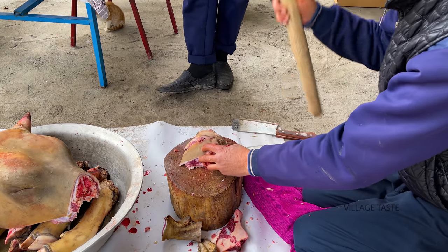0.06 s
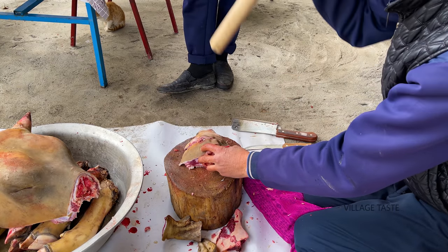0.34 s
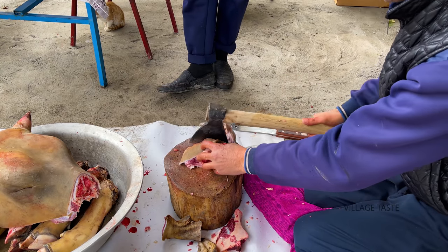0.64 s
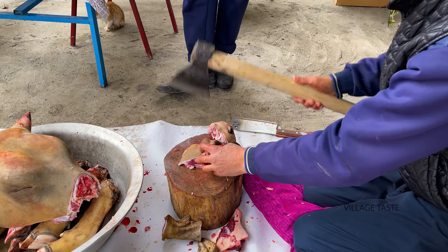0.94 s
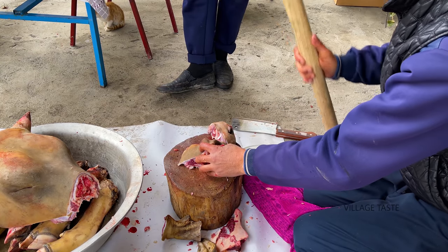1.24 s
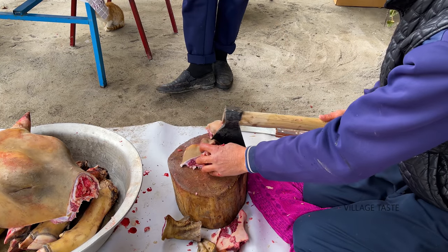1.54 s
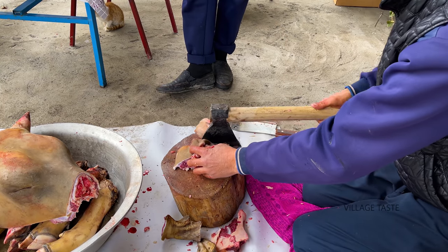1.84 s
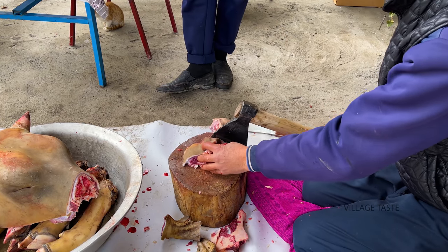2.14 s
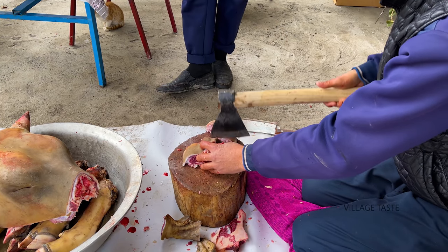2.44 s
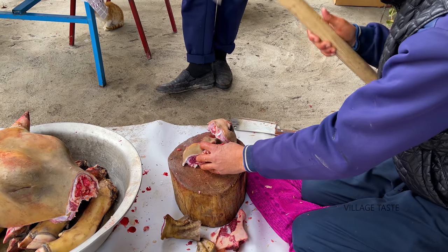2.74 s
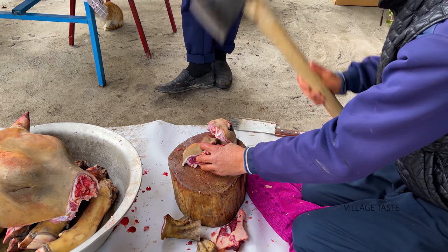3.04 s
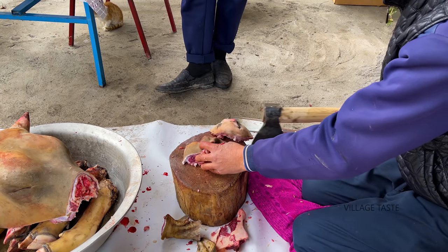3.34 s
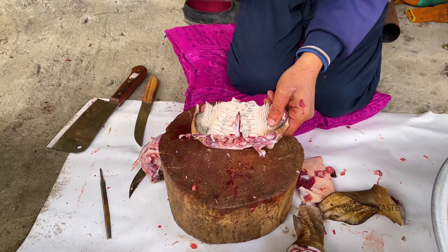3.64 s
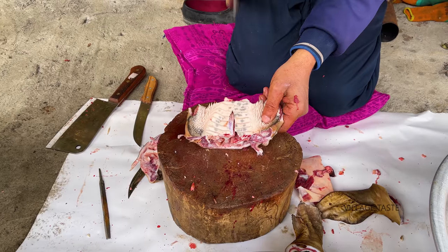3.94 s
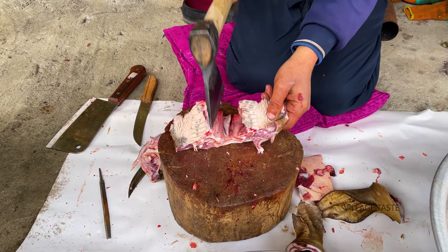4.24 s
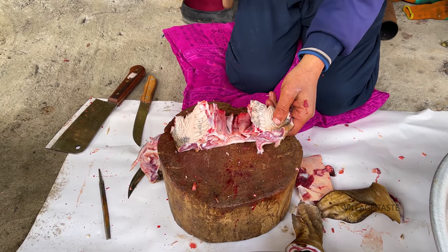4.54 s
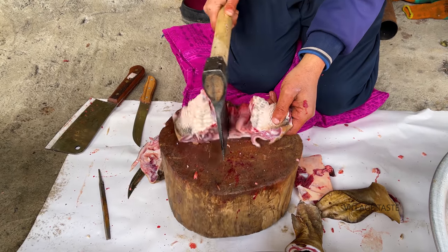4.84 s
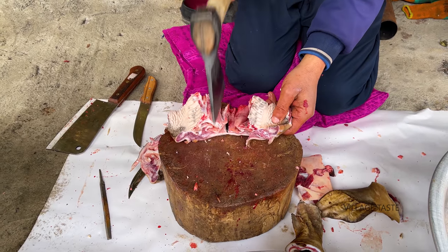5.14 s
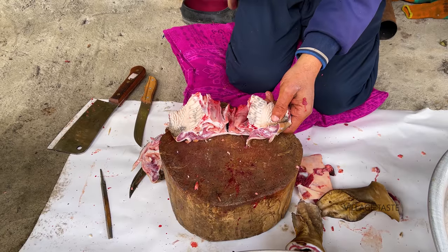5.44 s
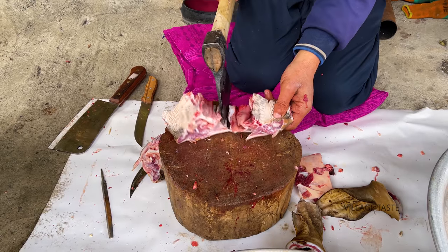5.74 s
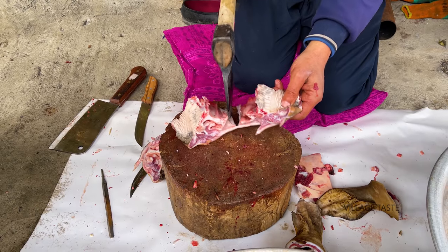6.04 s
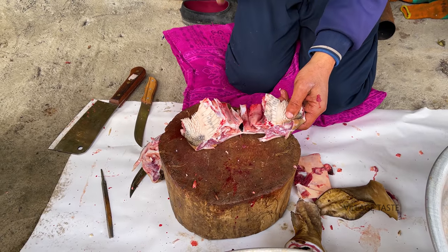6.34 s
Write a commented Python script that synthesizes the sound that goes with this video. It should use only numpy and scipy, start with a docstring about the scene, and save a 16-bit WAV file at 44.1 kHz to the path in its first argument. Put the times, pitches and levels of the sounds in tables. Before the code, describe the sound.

A hatchet chops meat and bone on a log block in a paved yard, about a metre away and slightly to the left. Six blows land at about 0.6, 1.4, 3.2, 4.1, 4.9 and 5.6 seconds. Each is a sharp crunch of bone with a hard wooden knock, a low thump of the block on the ground and a brief wet spatter, followed by a light echo. The last three sound slightly closer and drier, and the final two knock hardest. Between blows there are small wet snaps of sinew, soft rustles of sleeves and meat, and light taps on the block, the clearest near 3.7 seconds. The steel rings very faintly as it comes free around 0.8, 1.6, 2.5 and 3.4 seconds. A low distant rumble and soft open air continue throughout, with a few barely audible bird whistles.

```python
"""A hatchet chops meat and bone on a log block: six blows, in a paved yard, about a metre from a phone.
In each blow the bone crunches, the blade knocks into the wood and bounces once, the block thumps
on the ground and wet bits scatter. The yard echoes. Between blows meat is handled, sinew snaps,
sleeves rustle and the steel rings faintly. Behind it all are a low distant rumble and a faint bird."""
import sys
import numpy as np
from scipy import signal
from scipy.fft import rfft, irfft, next_fast_len
from scipy.io import wavfile

SR = 44100
rng = np.random.default_rng(int(sys.argv[2]) if len(sys.argv) > 2 else 0)


def dump_mix(stems):
    """Bounce the given channels to the path in sys.argv[1] as a 16-bit WAV at rate SR."""
    frames = np.atleast_2d(stems).T  # one column per channel
    limited = np.clip(frames, -1, 1)  # hard clip at full scale
    pcm = np.round(limited * 32767).astype(np.int16)
    wavfile.write(sys.argv[1], SR, pcm)


N = 281799
TIME = np.arange(N) / SR
AGE = TIME[:SR]  # seconds since a sound began

# tone of the distant rumble and open air: frequency_hz, level_db
AIR_TONE = [(20, -18.5), (42, -10), (63, 8), (85, -14.5), (120, -8), (170, -17), (350, -26.5), (800, -28.5),
            (1600, -33.5), (3000, -44.5), (6000, -53), (9500, -42.5), (11300, -48.5), (12300, -71.5),
            (14000, -83.5)]
# the part of the air that is opposite in the left and right ears: frequency_hz, gain_db
AIR_WIDTH = [(60, -14.5), (200, -10.5), (450, 1.5), (2500, 3), (7000, 3), (10000, -12)]
# loudness of the background: time_s, level_db
AIR_LEVELS = [(0, -41.5), (3.65, -44.5), (3.8, -46.5), (6.39, -49)]
# a far bird's whistles: start_s, length_s, top_hz, top_place (0 to 1), level_db
BIRD_WHISTLES = [(.01, 0.22, 4400, 0.13, -71.5), (2.385, .19, 4530, 0.52, -61.5),
                 (3.668, .17, 4230, .25, -74), (4.323, .11, 4475, .25, -74)]
# the yard's echo (a fade is the time to drop by 60 dB):
# band_hz, scatter_db, scatter_fade_s, wall_db, wall_fade_s, left_right_likeness (0 to 1)
YARD_ECHO = [(68, -21, 0.66, -24.5, 1.7, 0.99), (198, -20.5, 0.36, -32.5, 1.42, 0.71),
             (407, -14, 0.14, -34, 0.99, .02), (1160, -18, 0.078, -30.5, 0.3, .02),
             (3200, -18.5, .14, -35.5, 0.71, 0.17), (6350, -20.5, 0.21, -45.5, 1.2, 0.067),
             (11500, -27, 0.065, -39, 0.14, 1), (13500, -27.5, .08, -56.5, .3, .9)]
# the stuck blade is worked out of the meat: middle_s, half_length_s, level_db, centre_hz
BLADE_PULLS = [(2.094, 0.051, -65, 6800), (2.501, 0.077, -59, 9900), (6.079, .11, -70.5, 5540)]
# bone and blade set down on the block: start_s, level_db, centre_hz
BLOCK_TAPS = [(1.667, -41, 1240), (2.166, -39, 550), (3.690, -32, 1100), (4.972, -43.5, 2260),
              (5.754, -46.5, 1509)]
# wet sinew snapping: start_s, level_db, fade_s
SINEW_SNAPS = [(0.786, -52.5, 0.044), (0.8887, -55.5, .07), (1.583, -49, 0.052), (1.6695, -53, .04),
               (2.446, -51.5, .04), (2.5306, -47.5, .03), (3.412, -49, .09), (3.497, -36.5, 0.0074),
               (4.4705, -44.5, 0.018)]
# the steel rings as it comes free: start_s, pitch_hz, level_db, fade_s
STEEL_RINGS = [(0.801, 3165, -62.5, 1.2), (1.587, 3110, -61.5, 1.1), (2.509, 2903, -61, 1.4),
               (3.388, 3110, -58, 0.77)]
# notes of the block rocking on the ground, before the hand damps them: pitch_hz, level_db, fade_s
GROUND_NOTES = [(82, -6, 0.18), (108, 0.5, 0.054), (166, -2.5, 0.029), (66.15, -15, 0.55)]
# notes of block, bone and hatchet head: pitch_hz, level_db, fade_s
BLOCK_NOTES = [(187.2, -14, 0.22), (255, -13.5, 0.087), (328, -6.5, 0.031), (432.2, -6.5, 0.066),
               (555.4, -4.5, 0.078), (754, -8.5, 0.043), (856, -6, 0.03), (943, -12.5, 0.12),
               (1103.6, -9.5, 0.073), (1250, -8, 0.042), (1478.5, -9.5, 0.069), (1785, -16, .09),
               (1972, -13.5, 0.092), (3190, -16, 0.11)]
# the blade lands in the block (each knock slides down through its pitch):
# start_s, pitch_hz, swell_s, level_db, bounce_pitch_hz, bounce_loss_db
BLADE_KNOCKS = [(0.5742, 808, 0.0042, -13, 960, 10), (1.43, 594, 0.0049, -6, 305, 5.5),
                (3.176, 682, 0.0024, -7, 620, 7.5), (4.062, 483.4, .0031, -14.5, 230, 11.5),
                (4.8599, 454, 0.0037, -2.5, 596, 15.5), (5.6075, 355, 0.002, -2.5, 190, 15.5)]
# tone of breaking bone: frequency_hz, level_db
BONE_TONE = [(100, -6), (500, -6), (1000, 2), (2000, -1.5), (3200, -5), (4200, -6.5), (5300, -2),
             (7000, -13), (9800, -0.5), (11500, -6.5), (13500, -27), (15800, -26.5)]
# bone giving way: start_s, length_s, level_db, tilt_db_per_octave, note_hz, note_lift_db, spatter_db
BONE_CRUNCHES = [(0.567, 0.0085, -9.5, -2, 980, 5, -35), (1.4262, 0.007, -15, 0.2, 1440, 10.5, -25),
                 (3.174, 0.0039, -14.5, -2.54, 1044, 2.5, -32.5), (4.043, .006, -9.5, 1.6, 2048, 11, -33.5),
                 (4.0492, .0033, -9.5, -0.9, 1054, 8.5, -34), (4.0539, .0065, -9, 1.1, 3052, 12, -32),
                 (4.853, 0.0084, -12, -.5, 2116, 1.5, -29.5), (5.598, 0.0079, -11, 1, 1700, 0, -22)]
# the block stands a little to the left, so that side gains and the right loses: frequency_hz, gain_db
LEFT_GAIN = [(150, 0.2), (400, 0.49), (750, 2.6), (1500, 2.6), (3000, 2.1), (9000, .1)]
# how far the wave at the left microphone opening leads the right: frequency_hz, lead_radians
MIC_LEAD = [(20, 0), (1500, .25), (2600, 1.3), (4000, 1.6), (5300, 3.1), (6500, 1), (7700, 2.4),
            (8300, 2.2), (8700, -.3), (10200, -3.14), (12000, -6.1), (13600, -9.4), (15500, -12.5)]

CLOSER_S = 3.75  # the phone stands closer from here on: less echo on the bone, less hiss


def gain(db):
    """Turn decibels into a number to multiply by."""
    return 10 ** (np.asarray(db) / 20)


def unit(x):
    """Scale a sound to an average (rms) level of 1."""
    return x / np.sqrt(np.mean(x ** 2))


def add(track, start_s, sound):
    """Mix a sound into a track."""
    i = max(int(start_s * SR), 0)
    track[i:i + len(sound)] += sound[:N - i]


def along(octaves, points):
    """Read between (frequency_hz, value) points on an octave scale."""
    hz, value = np.transpose(points)
    return np.interp(octaves, np.log2(hz), value)


def colour(x, db_at):
    """Change a sound's tone: db_at(o) gives the gain in dB at octave o, the log2 of frequency."""
    octaves = np.log2(np.fft.rfftfreq(x.shape[-1], 1 / SR) + 1)
    return irfft(rfft(x) * gain(db_at(octaves)), x.shape[-1])


def band(x, hz, octaves):
    """Keep a broad band around hz, at level 1."""
    centre = np.log2(hz)
    return unit(colour(x, lambda o: -10 * np.log10(1 + ((o - centre) / octaves) ** 4)
                       - 3 * abs(o - centre)))


def grains(size, per_s, spread_db):
    """A crackle of tiny random clicks of unequal strength."""
    happens = rng.random(size) < per_s / SR
    strength = gain(spread_db * np.minimum(rng.exponential(size=size), 4))
    return unit(happens * strength * rng.choice([-1, 1], size))


def fade(t, fade_s):
    """Die away by 60 dB every fade_s."""
    return np.exp(-np.log(1000) * t / fade_s)


def wander(per_s):
    """A random drift, mostly between -1 and 1."""
    return np.interp(TIME * per_s, np.arange(1024), rng.standard_normal(1024))


def stereo_noise(size, likeness):
    """Left and right noise, from unrelated (0) to the same (1)."""
    mid, side = rng.standard_normal((2, size))
    return np.sqrt((1 + likeness) / 2) * mid + np.sqrt((1 - likeness) / 2) * np.array([side, -side])


def background():
    """Distant rumble and open air; the bass throbs and is alike on both sides."""
    mid, side = rng.standard_normal((2, next_fast_len(N)))
    side = colour(side, lambda o: along(o, AIR_WIDTH))
    air = unit(colour(mid + np.array([side, -side]), lambda o: along(o, AIR_TONE)))
    bass = colour(air, lambda o: along(o, [(120, 3.5), (300, -24)]))[:, :N]
    hiss = colour(air, lambda o: along(o, [(2000, -33.5), (5000, 2.5)]))[:, :N]
    rest = air[:, :N] - bass - hiss
    air = bass * gain(0.5 * wander(1.4)) + rest * gain(wander(0.93))
    air += hiss * gain(-2.5 * (TIME > CLOSER_S))
    return air * gain(np.interp(TIME, *np.transpose(AIR_LEVELS)))


def bird():
    """A far bird's thin whistles, each a slightly unsteady arch in pitch."""
    out = np.zeros(N)
    for start_s, length_s, top_hz, top_place, db in BIRD_WHISTLES:
        size = int(length_s * SR)
        progress = np.linspace(0, 1, size)
        hz = top_hz * (1 - .14 * (progress - top_place) ** 2) * (1 + .007 * wander(60)[:size])
        loudness = gain(db + 5 * wander(45)[:size]) * np.sqrt(4 * progress * (1 - progress))
        add(out, start_s, loudness * np.sin(2 * np.pi * np.cumsum(hz) / SR))
    return out


def yard(direct, to_walls):
    """Ground, basin and people scatter the sound at once; the walls answer later and longer."""
    t = TIME[:2 * SR]
    octaves = np.log2(np.fft.rfftfreq(len(t), 1 / SR) + 1)
    centres = np.log2([row[0] for row in YARD_ECHO])
    scatter, walls = 0, 0
    for share, row in zip(np.eye(len(YARD_ECHO)), YARD_ECHO):
        _, scatter_db, scatter_fade_s, wall_db, wall_fade_s, likeness = row
        one_band = np.sqrt(np.interp(octaves, centres, share) / (SR / 1000))
        early, late = (irfft(rfft(stereo_noise(len(t), likeness)) * one_band) for _ in range(2))
        scatter += gain(scatter_db) * early * fade(t, scatter_fade_s) * np.clip((t - .002) / .0014, 0, 1)
        walls += gain(wall_db) * late * fade(t, wall_fade_s) * np.clip((t - .01) / .03, 0, 1)
    near_echo = signal.fftconvolve(direct[None], scatter, axes=1)
    far_echo = signal.fftconvolve(to_walls[None], walls, axes=1)
    return (near_echo + far_echo)[:, :N]


def rustles():
    """Cloth and meat slide before and after each blow, and while the blade is worked loose."""
    out, moves = np.zeros(N), list(BLADE_PULLS)
    for blow_s, *_ in BLADE_KNOCKS:
        moves.append((blow_s - .105, .028, -65, 7500))  # a swish before the blow
        ease_db = -71.5 if blow_s > CLOSER_S else -57  # the later, flatter cuts grip the blade less
        moves.append((blow_s + .22, .039, ease_db, 6100))
    for middle_s, half_s, db, hz in moves:
        rub = band(grains(SR, per_s=550, spread_db=3), hz, octaves=1.6)
        loudness = gain(db + 4.7 * wander(36)[:SR]) * np.exp(-(AGE / half_s - 3) ** 2)
        add(out, middle_s - 3 * half_s, rub * loudness)
    return out


def tap(db, hz, octaves, fade_s, rise_s=.0026):
    """A small contact: a crackle that dies quickly. Meat cushions it, slowing the rise."""
    crackle = band(grains(SR, per_s=5000, spread_db=2), hz, octaves)
    return gain(db) * crackle * fade(AGE, fade_s) * np.minimum(AGE / rise_s, 1)


def handling():
    """Between blows: rustles, taps with a bright click, snapping sinew and the steel's wavering ring."""
    out = rustles()
    for start_s, db, hz in BLOCK_TAPS:
        add(out, start_s, tap(db, hz, octaves=.43, fade_s=.083))
        add(out, start_s, tap(db - 15, hz=2700, octaves=1.1, fade_s=.166))
    for start_s, db, fade_s in SINEW_SNAPS:
        add(out, start_s, tap(db, hz=7600, octaves=.55, fade_s=fade_s, rise_s=.0004))
    for start_s, hz, db, fade_s in STEEL_RINGS:
        waver = gain(db + 3 * wander(25)[:SR]) * np.minimum(AGE / .03, 1)
        add(out, start_s, waver * fade(AGE, fade_s) * np.sin(2 * np.pi * hz * AGE))
    # soft things give little of the highest treble
    return colour(out, lambda o: along(o, [(11000, -1), (12800, -19)]))


def ring(notes, cutoff_hz, rise_cycles):
    """A struck object's notes; each needs time to build up, and the low ones take longest."""
    out = 0
    for k, (hz, db, fade_s) in enumerate(notes):
        build = 1 - np.exp(-(AGE * hz / rise_cycles) ** 2)
        strength = gain(db) / np.sqrt(1 + (hz / cutoff_hz) ** 4)
        wave = np.sin(2 * np.pi * hz * (1 + .007 * rng.standard_normal()) * AGE)
        out += (-1) ** k * strength * build * fade(AGE, fade_s) * wave
    return out


def knock(hz, swell_s, db, sink_s=.013):
    """The blade bites into wood: a few strong cycles that drop in pitch as more of the block moves."""
    pitch = hz * (1.2 - .82 * (1 - np.exp(-AGE / sink_s)))
    push = (AGE / swell_s) ** 2 * np.exp(2 - 2 * AGE / swell_s)
    return gain(db) * push * np.sin(2 * np.pi * np.cumsum(pitch) / SR)


def landing(hz, swell_s, db):
    """One bite into the block: knock, ring and ground thump, heard directly and sent to the walls."""
    # a shallow bite knocks higher, rings the block louder and brighter, and sends more to the walls
    shallow = np.log2(hz / 560)  # octaves above a middling bite
    block = ring(BLOCK_NOTES, cutoff_hz=880 * 2 ** (1.3 * shallow), rise_cycles=.41)
    wood = knock(hz, swell_s, db) + gain(db + 1 + 10.5 * shallow) * block
    thump = gain(db - 3.5) * ring(GROUND_NOTES, cutoff_hz=400, rise_cycles=.3)
    thump *= fade(AGE, .76)  # the hand on the meat damps the rocking
    # the ground answers once the push has built up
    thump = np.interp(AGE - 1.35 * swell_s, AGE, thump, left=0)
    # each side of the block sends out other notes, so its echo is a broad wash
    wash = band(rng.standard_normal(SR), .86 * hz, octaves=1) * unit(fade(AGE, .085)) * wood.std()
    to_walls = wash + gain(-22.5) * wood + gain(-2.5) * thump
    return wood + thump, gain(7 * shallow - .5) * to_walls


def squash(db, swell_s=.003):
    """The edge presses through soft meat just before it meets bone."""
    size = SR // 20
    squelch = band(grains(size, per_s=10000, spread_db=2.4), hz=1000, octaves=2.8)
    return gain(db) * squelch * np.exp(-AGE[:size][::-1] / swell_s)


def crunch(length_s, db, tilt, note_hz, lift_db, spatter_db):
    """Tiny cracks swell as the edge cuts bone, then wet bits patter: heard directly and off the walls."""
    def bone(x, top_hz):
        """Give a noise the tone of this bone."""
        note = lambda o: lift_db * np.exp(-((o - np.log2(note_hz)) / .25) ** 2)
        slope = lambda o: tilt * (o - np.log2(3000))
        dull = lambda o: 60 * np.maximum(o - np.log2(top_hz), 0)
        return unit(colour(x, lambda o: along(o, BONE_TONE) + slope(o) + note(o) - dull(o)))
    entry = np.minimum(AGE / .0014, 1)
    release = fade(np.maximum(AGE - length_s, 0), .008)
    force = entry * np.minimum(.15 + 1.9 * AGE / length_s, 1) * release
    cracks = gain(db) * bone(grains(SR, per_s=9000, spread_db=.86), top_hz=15500) * force
    spatter = gain(spatter_db) * bone(grains(SR, per_s=5000, spread_db=8.4), top_hz=15000)
    spatter *= np.minimum(AGE / length_s, 1) * fade(AGE, .19)
    # every direction gets its own crackle, so the walls receive a smooth wash of the same energy
    wash = bone(rng.standard_normal(SR), top_hz=12000) * unit(fade(AGE, .1))
    wash *= gain(db) * np.sqrt(np.mean(force ** 2))
    return cracks + spatter, wash + spatter


def hatchet():
    """Six blows through meat and bone into the block, each with one bounce, and what the walls get."""
    direct, to_walls = np.zeros((2, N))
    for start_s, *bone in BONE_CRUNCHES:
        heard, thrown = crunch(*bone)
        add(direct, start_s - .048, squash(db=-29))
        add(direct, start_s, heard)
        add(to_walls, start_s, gain(.5 if start_s < CLOSER_S else -6) * thrown)
    for start_s, hz, swell_s, db, bounce_hz, loss_db in BLADE_KNOCKS:
        first = landing(hz, swell_s, db)
        bounce = landing(bounce_hz, swell_s=.0028, db=db - loss_db)
        for delay_s, (heard, thrown) in ((0, first), (.0133, bounce)):
            add(direct, start_s + delay_s, heard)
            add(to_walls, start_s + delay_s, thrown)
    return direct, to_walls


def scene():
    """Blows, handling and bird echo in the yard, a little to the left, over the background."""
    direct, to_walls = hatchet()
    quiet_sounds = handling() + bird()
    direct += quiet_sounds
    to_walls += quiet_sounds
    mix = np.pad(direct + yard(direct, to_walls), ((0, 0), (0, next_fast_len(N) - N)))
    # a small block gives off little deep bass
    left, right = colour(mix, lambda o: along(o, [(25, -11), (42, -1.5), (58, 0)]))
    left = colour(left, lambda o: along(o, LEFT_GAIN))
    right = colour(right, lambda o: -along(o, LEFT_GAIN))
    return np.array([left, right])[:, :N] + background()


def record(dry):
    """The phone's two openings shift the treble between the sides; it rounds peaks and cuts the top."""
    peak_limit, top_hz = .95, 16000
    size = next_fast_len(N + 2048)
    lead = np.interp(np.fft.rfftfreq(size, 1 / SR), *np.transpose(MIC_LEAD))
    heard = irfft(rfft(dry, size) * np.exp(.5j * np.array([lead, -lead])), size)[:, :N]
    rounded = heard / (1 + (heard / peak_limit) ** 4) ** .25
    return signal.sosfilt(signal.ellip(8, .2, 70, top_hz, fs=SR, output="sos"), rounded)


dry = scene()
out = record(dry)
dump_mix(out)
```